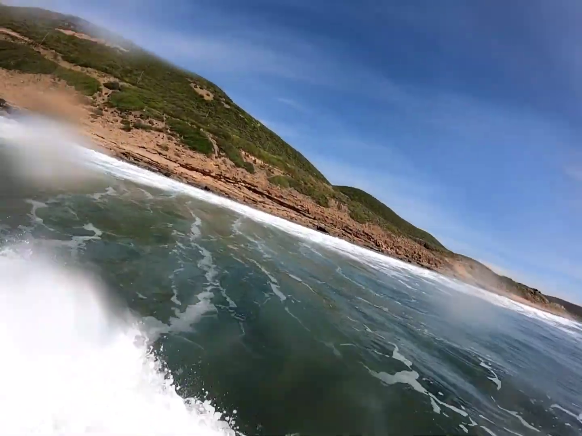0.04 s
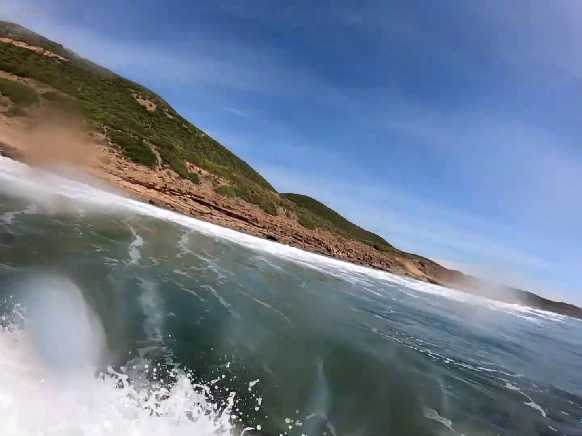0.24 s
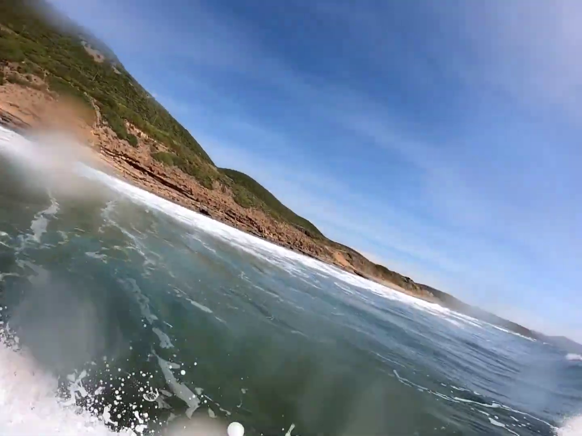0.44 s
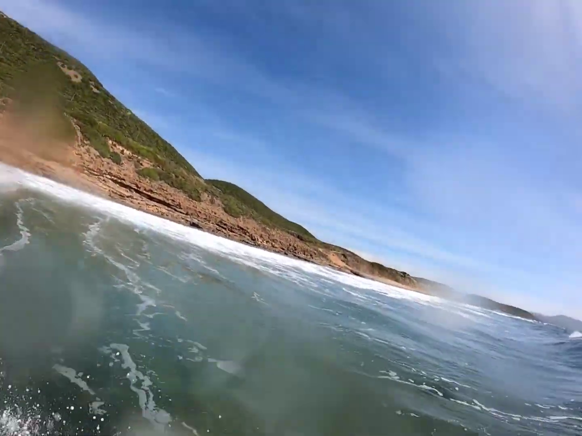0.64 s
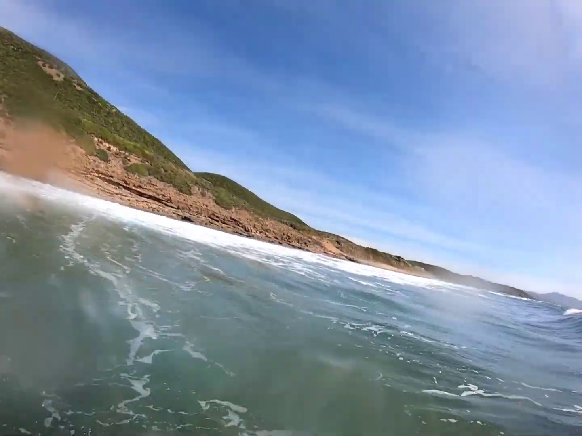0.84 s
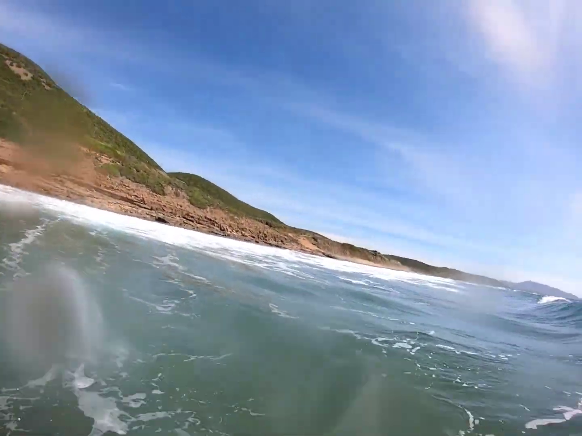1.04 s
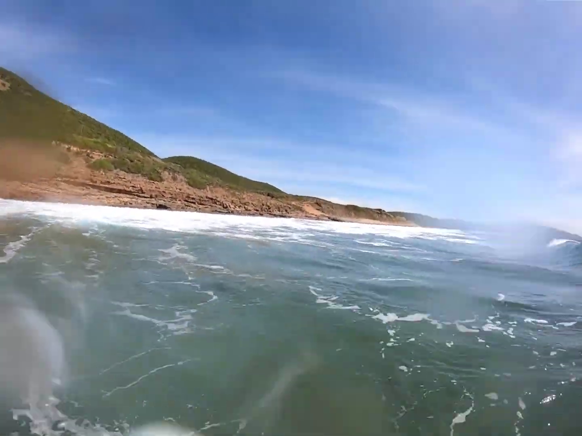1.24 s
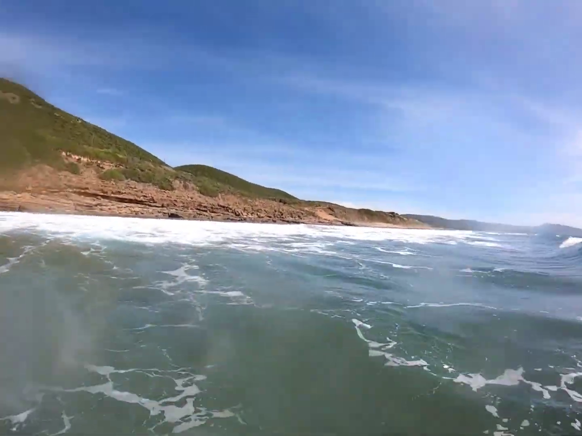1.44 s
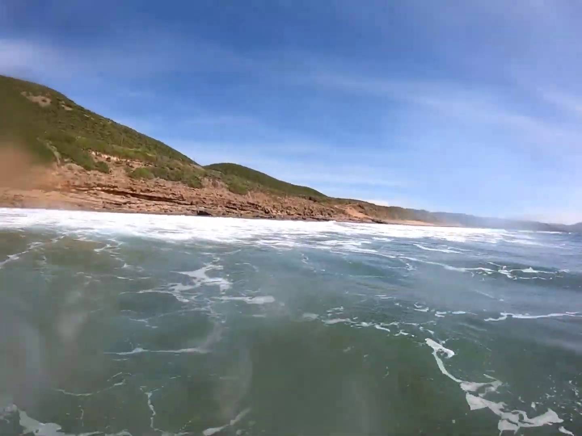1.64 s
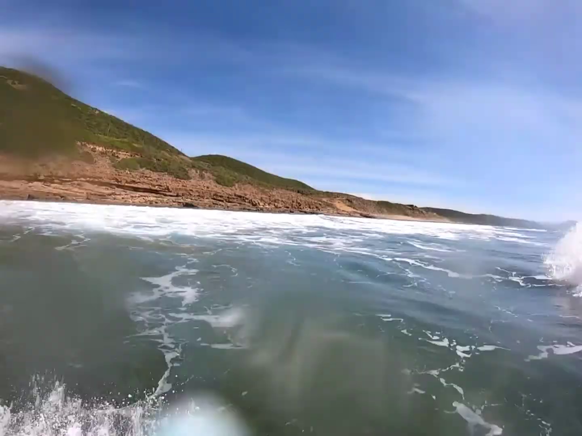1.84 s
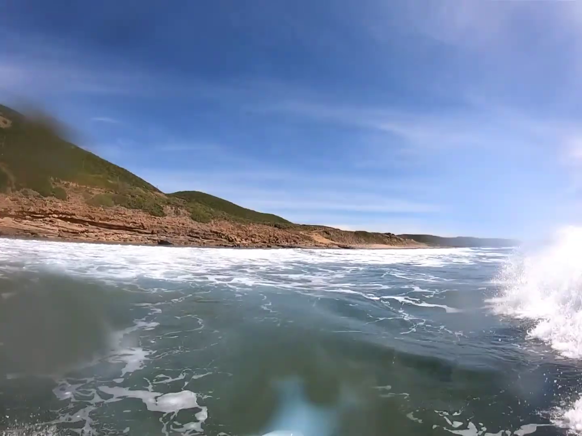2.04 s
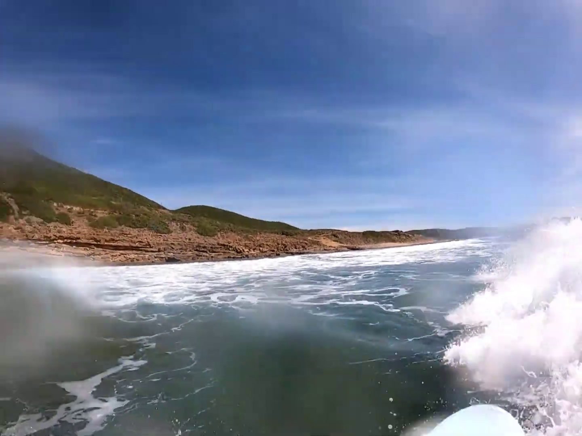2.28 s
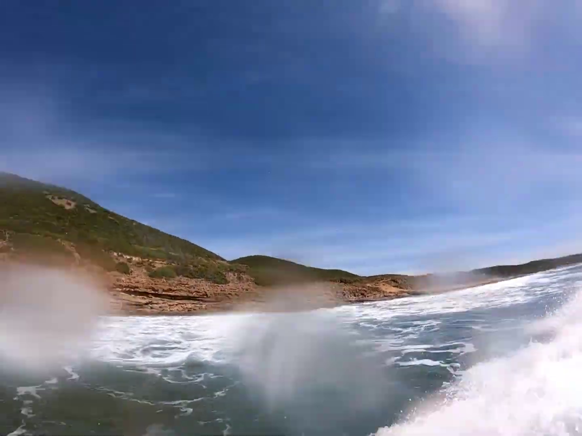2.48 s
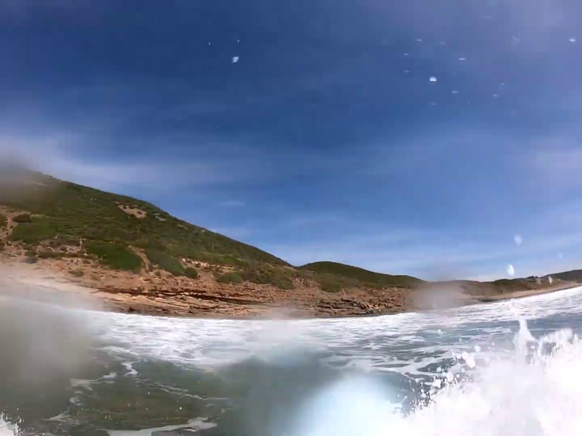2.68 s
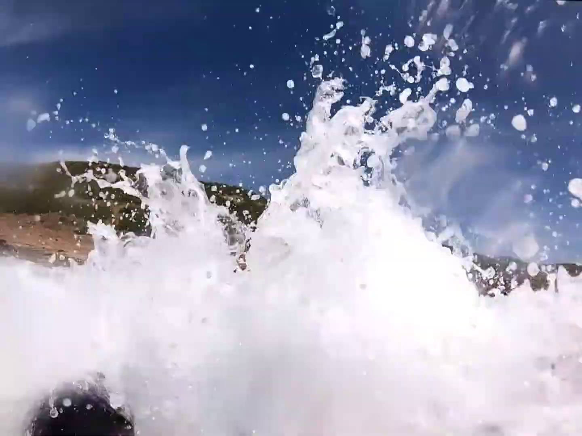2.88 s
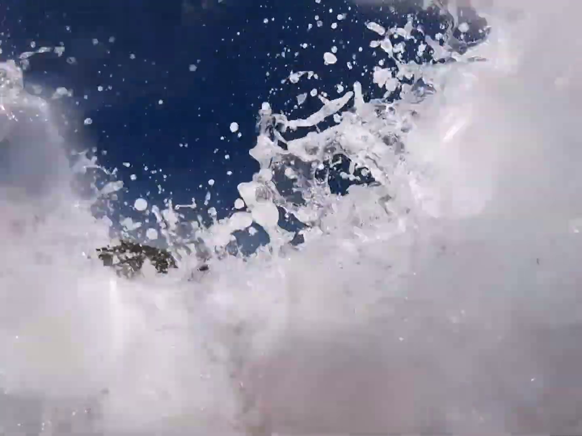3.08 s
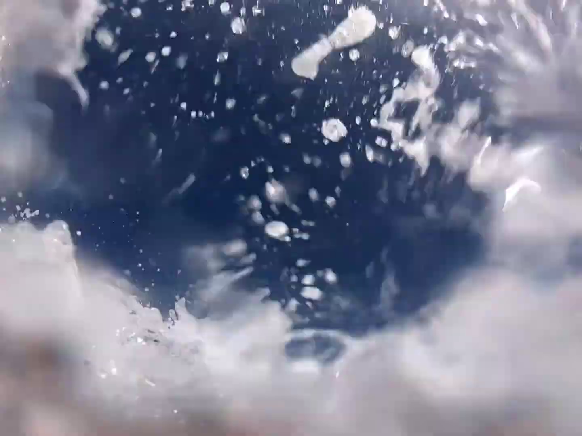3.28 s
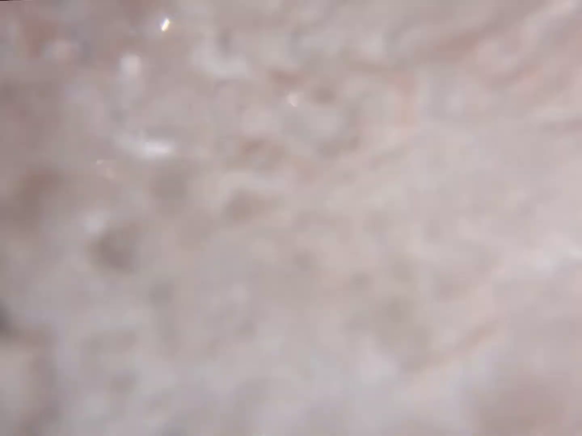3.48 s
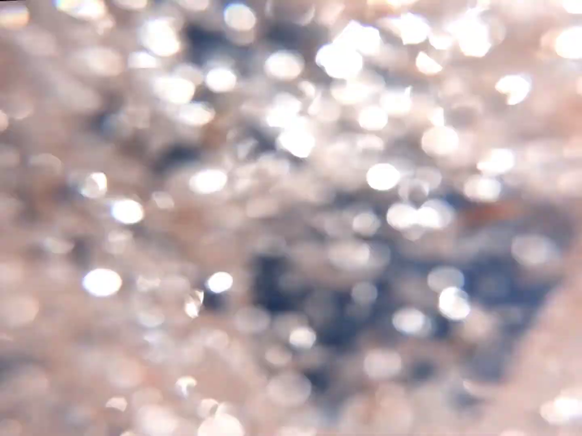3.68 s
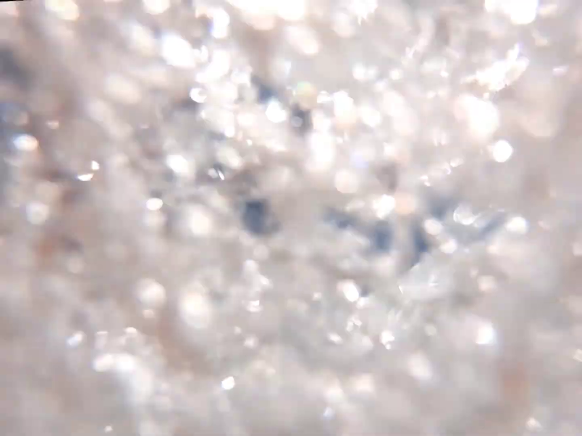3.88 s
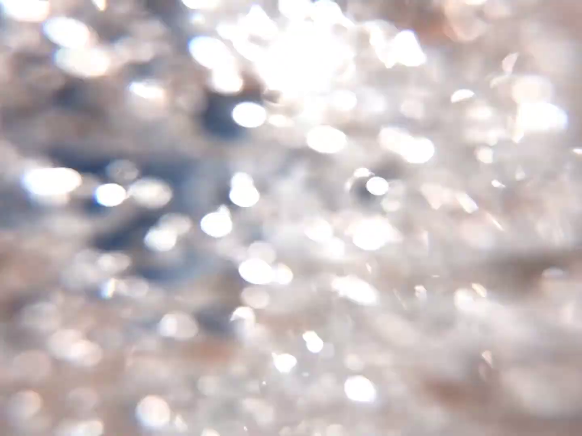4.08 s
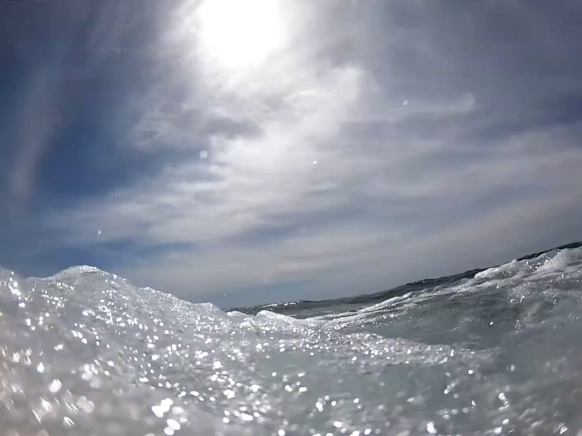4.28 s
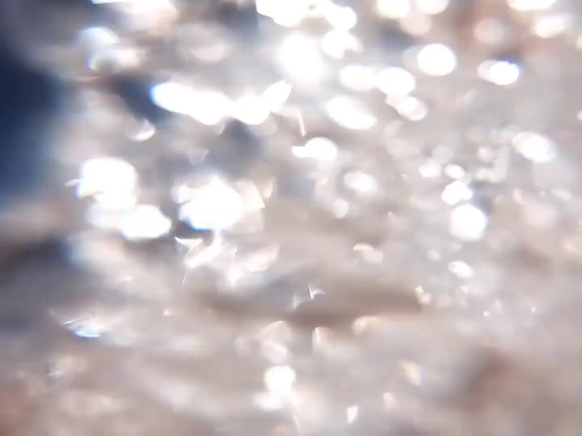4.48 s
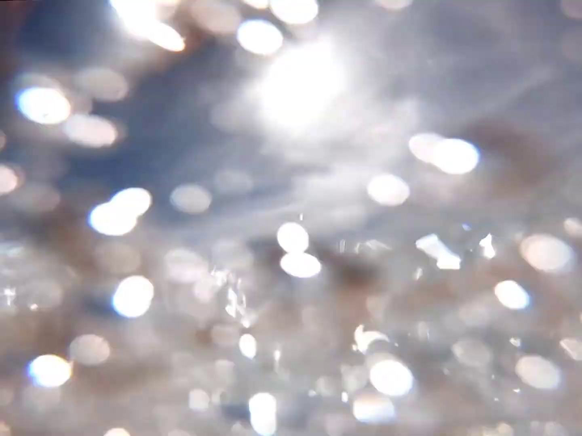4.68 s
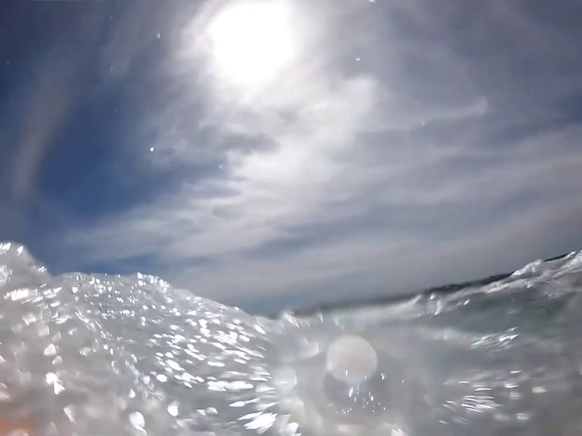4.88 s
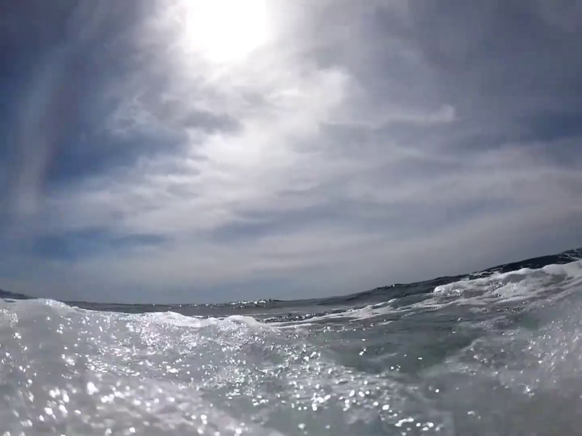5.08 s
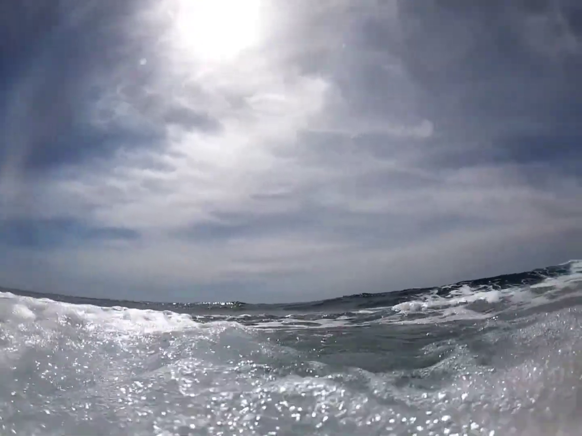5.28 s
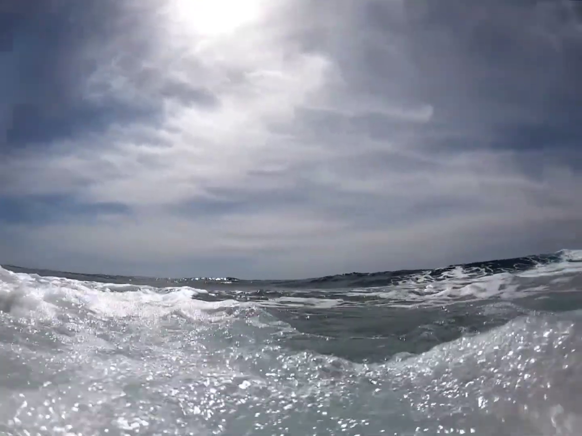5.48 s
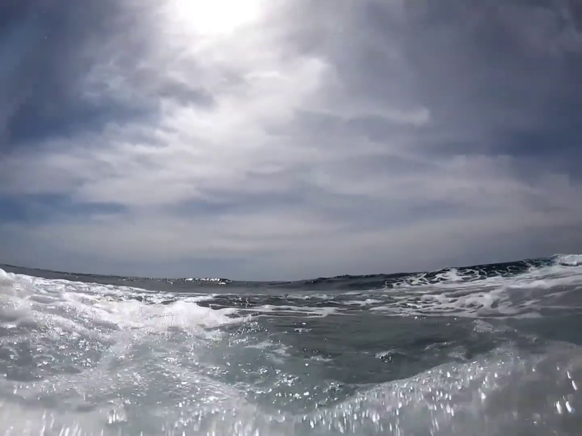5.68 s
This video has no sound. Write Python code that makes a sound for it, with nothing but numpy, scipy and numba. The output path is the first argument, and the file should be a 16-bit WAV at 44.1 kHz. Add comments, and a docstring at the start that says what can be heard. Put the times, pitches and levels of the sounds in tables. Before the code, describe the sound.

Rushing seawater and wind buffet the microphone, then a wave splashes over it and everything turns to muffled sloshing, gurgles and bubbles.

```python
"""At the waterline on a surfboard, a sealed camera rides along as the wake rushes past in the wind.
White water sprays the case, then the camera tumbles under. Sloshing water thumps and slaps the case,
air pockets gurgle, and small bubbles sing and pop. Water over the microphone port (its small opening)
dulls the sea, and the sound drops out for a moment under water."""
import sys
import numpy as np
from scipy import signal
from scipy.fft import rfft, irfft, next_fast_len
from scipy.io import wavfile
from scipy.ndimage import uniform_filter1d
from numba import njit

SR = 44100
rng = np.random.default_rng(int(sys.argv[2]) if len(sys.argv) > 2 else 0)


def output_pcm(signal):
    """Save a mono or channel-first signal as 16-bit PCM at the path in sys.argv[1].

    Samples are clipped to [-1, 1] before scaling.
    """
    pcm = np.clip(np.atleast_2d(signal).T, -1, 1) * 32767
    wavfile.write(sys.argv[1], SR, np.round(pcm).astype(np.int16))


N = 252693
T = np.arange(N) / SR
DROPOUT_START_S, DROPOUT_END_S = 4.32434, 4.37276

# Wake and wind while the port is in the open: (time [s], level [dB])
WAKE_LEVEL = [(0.0, -24.5), (1.99, -27), (2.48, -24.5), (3.12, -23.5), (3.33, -20.5), (3.37, -18),
              (3.45, -21), (3.5, -33.5), (4.33, -42.5)]
# How strong the wake is from low to high: (frequency [Hz], level [dB])
WAKE_TONE = [(15, -45.5), (25, -7), (70, -4.5), (128, 0), (231, -4), (558, -3.5), (968, -14.5), (1380, -26),
             (1790, -25.5), (2450, -33), (2950, -33.5), (3250, -39.5), (4700, -45.5), (5050, -56.5),
             (7500, -66.5), (9500, -85)]
# Boost or cut of the foam's high fizz: (time [s], gain [dB])
FIZZ_GAIN = [(0, 1), (.3, -0.5), (2.2, 4), (2.6, -2), (3.3, 3.5), (3.5, -3.5), (3.98, 5), (4.05, 5.5)]
# Foam heard again each time the port clears: (time [s], level [dB], length [s])
FOAM_GUSHES = [(3.514, -23, 0.062), (3.595, -27, 0.047), (3.676, -23, .11), (3.817, -29.5, 0.17),
               (3.976, -31.5, 0.015), (4.225, -31, 0.0087)]
# Thin spot in the foam and spray, where the port cancels sound: (time [s], frequency [Hz])
PORT_DIP_HZ = [(0, 1280), (.4, 1320), (1.1, 1355), (1.4, 1620), (2.0, 1476), (2.3, 1490), (2.52, 1590),
               (2.66, 1184), (3.3, 1296), (3.5, 700), (3.9, 852), (4.02, 1410)]
# Top of what the water film over the port lets through: (time [s], frequency [Hz])
FILM_CUTOFF = [(0, 13730), (3.35, 13600), (3.4, 3326), (4.32, 3320), (4.37, 2250), (5.73, 2050)]

# Water heaving around the case: (time [s], level [dB])
SLOSH_LEVEL = [(2.9, -41.5), (3.3, -31.5), (3.45, -18), (4.03, -16), (4.06, -18), (4.3, -16.5),
               (4.55, -23.5), (4.9, -17.5), (5.23, -26), (5.37, -34.5), (5.73, -30.5)]
# How strong the slosh is from low to high: (frequency [Hz], level [dB])
SLOSH_TONE = [(12, -38.5), (25, -6), (50, -6), (100, -11.5), (150, -15), (270, -25), (300, -38.5),
              (700, -52.5), (1000, -62), (1700, -58.5), (1900, -69), (2550, -68), (2750, -93.5)]
# Low edge of the slosh, sinking as the case goes deeper: (time [s], frequency [Hz])
SLOSH_LOW_EDGE = [(2.9, 65), (3.9, 93), (4.4, 51), (5.73, 9.2)]
# Single lurches of that water: (time [s], level [dB])
SLOSH_LURCHES = [(3.355, -10), (4.39, -16.5), (5.26, -28.5), (5.42, -22.5), (5.69, -22.5)]
# Single slaps and gulps: (time [s], level [dB], pitch [Hz])
WATER_SLAPS = [(2.934, 1.5, 307), (2.982, -3, 224), (3.071, 1.5, 201), (3.145, -7, 214), (3.206, -3.5, 209),
               (3.358, -7.5, 610), (3.368, -6, 400), (3.382, 0.5, 300), (3.408, 9.5, 280), (3.466, 5, 230),
               (3.523, -3.5, 368), (3.571, 1.5, 390), (3.701, 5, 191), (3.783, -6.5, 489),
               (3.979, 2.5, 379), (4.026, 0.5, 181), (4.128, -7, 535), (4.165, -4, 358), (4.237, -4, 482),
               (4.304, -9, 194), (4.368, -9.5, 152), (4.417, -11.5, 248), (4.643, -0.5, 292.4),
               (4.715, 1, 185), (4.864, -5, 240), (4.994, -15, 206.4), (5.132, -15.5, 235.6),
               (5.273, -19, 187), (5.468, -16, 207.5), (5.689, -19, 273.5)]

# Hollow behind the case door, shaken by the water: (time [s], level [dB])
HOLLOW_LEVEL = [(2.88, -20.5), (3.27, -17.5), (3.47, -21.5), (3.49, -30), (3.7, -25), (4.3, -26),
                (4.6, -22), (5.1, -26.5), (5.73, -34)]
# Its note as water fills and leaves it: (time [s], pitch [Hz])
HOLLOW_PITCH = [(2.95, 286.5), (3.02, 206.3), (3.25, 196.4), (3.38, 389.6), (3.47, 245.3), (3.53, 369),
                (3.78, 471), (3.95, 445), (4.3, 456), (4.38, 233.5), (5.73, 238.5)]
# Air pocket at the port, rung by drops and bubbles: (time [s], level [dB])
POCKET_LEVEL = [(0, -46), (.22, -42.5), (.4, -59.5), (2.26, -54.5), (2.36, -45), (2.62, -35.5),
                (2.9, -38.5), (3.3, -25.5), (3.47, -25.5), (3.6, -37), (3.67, -24.5), (3.77, -24.5),
                (3.79, -35.5), (3.9, -35.5), (4.11, -71.5), (4.58, -58), (4.68, -41.5), (4.87, -48),
                (4.96, -58.5), (5.73, -64)]
# Its note as it swells and shrinks: (time [s], pitch [Hz])
POCKET_PITCH = [(.3, 1700), (2.28, 1497), (2.35, 1810), (2.54, 1880), (2.62, 1604), (2.85, 1556),
                (3.1, 997), (3.5, 940), (3.75, 1194), (3.87, 1183), (3.9, 1617), (4.2, 1856), (4.4, 1014),
                (4.9, 1057), (5.4, 1435)]
# Gurgles that ring it harder: (time [s], level [dB])
POCKET_GURGLES = [(2.292, -27), (3.375, -20.5), (3.528, -21.5), (3.569, -24), (3.63, -19.5), (3.854, -29.5),
                  (4.13, -40), (4.629, -34)]

# Mist of white water around the case: (time [s], level [dB])
SPRAY_LEVEL = [(2.28, -61), (2.31, -47), (2.45, -45), (2.55, -49.5), (2.9, -56), (3.2, -63), (3.3, -42.5),
               (3.37, -40), (3.4, -51.5), (3.65, -70.5)]
# How strong the spray is from low to high: (frequency [Hz], level [dB])
SPRAY_TONE = [(410, -30.5), (700, 1.5), (1300, 2), (2400, -15), (4000, -27), (5000, -36.5), (7500, -52),
              (10500, -65), (13000, -96)]
# Volleys of drops striking the case: (time [s], level [dB])
SPRAY_VOLLEYS = [(2.292, -36.5), (2.315, -43), (2.93, -43.5), (3.079, -43), (3.14, -43), (3.01, -50.5),
                 (3.25, -40.5), (3.323, -35), (3.343, -32), (3.356, -32), (3.383, -41.5)]
# Spurts hitting the port itself: (time [s], level [dB], rough pitch [Hz])
PORT_SPURTS = [(1.358, -13, 696), (2.582, -11, 700), (2.864, -19, 923), (2.93, -18.5, 755),
               (3.369, -5, 890), (3.446, -6.5, 703), (3.699, -13, 990), (3.825, -15.5, 1170),
               (3.858, -15, 1150), (3.891, -13.5, 744), (3.938, -19, 1490), (4.122, -16.5, 1450),
               (4.171, -16, 708), (4.632, -19.5, 700), (4.649, -23, 597), (4.696, -34.5, 950),
               (4.731, -18, 584), (4.764, -31, 940), (4.851, -31.5, 1074), (4.986, -39, 600),
               (5.17, -36.5, 547), (5.293, -40.5, 600), (5.703, -34, 750)]
# Sharp ticks of drops on the port: (time [s], level [dB], rough pitch [Hz])
DROP_TICKS = [(1.865, -21.5, 1180), (2.69, -24, 1500), (3.341, -18, 2900), (3.965, -29, 2480),
              (4.232, -41, 2960), (3.3044, -49, 7100), (3.3227, -35.5, 5470), (3.671, -51, 4880),
              (3.696, -42.5, 3800), (3.866, -51, 4200), (3.963, -51, 5200), (4.166, -38, 2780),
              (4.186, -48, 3700), (4.221, -53, 4000), (4.281, -53, 3400), (4.457, -60.5, 4100),
              (4.488, -55, 2050), (4.73, -62, 3000), (4.718, -34, 1300), (4.763, -48.5, 1796),
              (4.83, -54, 2100), (4.95, -52.5, 1900), (5.082, -46.5, 1500), (5.127, -48, 1600),
              (5.21, -48, 900), (5.274, -41, 1400), (5.328, -45, 1050), (5.374, -50, 1000),
              (5.414, -44, 1390), (5.502, -51, 1750)]

# Trapped bubbles that sing for a moment: (time [s], level [dB], length [s], pitch [Hz])
SINGING_BUBBLES = [(3.491, -45, 0.043, 2320), (3.72, -40.5, 0.097, 1134), (3.852, -23.5, 0.017, 1117),
                   (3.938, -36, 0.044, 1567), (4.014, -45, 0.043, 1926), (4.017, -45, 0.03, 2290),
                   (4.148, -42, 0.063, 1906), (4.125, -46, 0.055, 2370), (4.417, -48.5, 0.12, 950),
                   (4.421, -48, 0.077, 1154), (4.694, -46.5, 0.15, 962), (5.266, -53.5, 0.038, 1094)]
# Crackle of tiny bubbles at the wet port: (time [s], level [dB])
CRACKLE_LEVEL = [(3.4, -42.5), (4.3, -46.5), (4.45, -43), (4.9, -53.5), (5.73, -53.5)]
# The middle of their range of notes: (time [s], pitch [Hz])
CRACKLE_PITCH = [(3.4, 2690), (4.3, 2620), (4.4, 780), (5.73, 814)]


def wake():
    """Dense bursts of foam rush by in the wind; the high fizz swells on its own."""
    bursts = impacts(per_s=20000, scatter_db=1.8)
    foam = port_dip(texture(bursts, WAKE_TONE, (450, 900), swell_db=.5 * wander(45), flicker_db=1.2))
    body = signal.sosfiltfilt(signal.butter(3, 1300, fs=SR, output="sos"), foam)
    fizz = undb(follow(FIZZ_GAIN)) * (foam - body)
    gushes = surges(*np.transpose(FOAM_GUSHES), rise_db_s=795.5, fall_db_s=599.5)
    return np.hypot(loudness(WAKE_LEVEL), gushes) * (body + fizz)  # hypot adds their powers


def slosh():
    """Lumps of water shove the case in deep, uneven surges."""
    shoves = impacts(per_s=3000, scatter_db=1.0)
    rumble = texture(shoves, SLOSH_TONE, (25, 150), swell_db=0.52 * wander(24), flicker_db=0.93)
    band, low = band_and_low(rumble, follow(SLOSH_LOW_EDGE), 0.99)
    heave = rumble - band - low  # keeps what lies above the low edge
    lurches = surges(*np.transpose(SLOSH_LURCHES), hold_s=0.039, rise_db_s=352, fall_db_s=126)
    return np.hypot(loudness(SLOSH_LEVEL), lurches) * heave


def slaps():
    """Each slap rings a bubble-filled space whose note glides up a little; harder ones die sooner."""
    out, t = np.zeros(N), np.arange(8192) / SR
    soft_push = (1 - np.exp(-t / 0.0011)) ** 2
    for start, db, hz in WATER_SLAPS:
        ring_s = np.clip(0.038 * undb(-0.54 * db), .008, .15)  # time to fade by 60 dB
        ring = np.sin(2 * np.pi * hz * t * (1 + 0.22 * t)) * np.exp(-np.log(1000) * t / ring_s)
        add_at(out, start, undb(db) * soft_push * ring)
    return out


def door_hollow():
    """The hollow behind the door glugs at each slap, most when the slap is near its own note."""
    starts, slap_db, slap_hz = np.transpose(WATER_SLAPS)
    octaves_apart = np.abs(np.log2(slap_hz / follow(HOLLOW_PITCH, starts)))
    glug_db = -16.5 + 0.53 * slap_db - 8 * octaves_apart
    glugs = surges(starts, glug_db, hold_s=0.0066, rise_db_s=1400, fall_db_s=520.5)
    ring = trapped_air(HOLLOW_PITCH, kicks_per_s=1200, damping=0.26, tremble=0.044)
    deep_ring = unit(bandpass(ring, follow(HOLLOW_PITCH), 0.14))  # deep under water it rings clearer
    return np.hypot(loudness(HOLLOW_LEVEL), glugs) * np.where(T < DROPOUT_END_S, ring, deep_ring)


def air_pocket():
    """Drops and bubbles make a small pocket of air at the port gurgle."""
    gurgles = surges(*np.transpose(POCKET_GURGLES), hold_s=0.0018, rise_db_s=898, fall_db_s=297)
    ring = trapped_air(POCKET_PITCH, kicks_per_s=1500, damping=0.2, tremble=.03)
    return np.hypot(loudness(POCKET_LEVEL), gurgles) * ring


def spurts():
    """Water hits the port in short, wet bursts of noise."""
    out, t = np.zeros(N), np.arange(4096) / SR
    shape = (1 - np.exp(-t / 0.0012)) ** 2 * np.exp(-t / 0.0082)
    for start, db, hz in PORT_SPURTS:
        burst = bandpass(rng.standard_normal(len(t)), hz, 0.71)
        burst = lowpass(burst, 1.8 * hz, 6.6)
        burst = lowpass(burst, 1.52 * hz, 1.4)
        add_at(out, start, undb(db) * shape * unit(burst))
    return out


def spray():
    """Droplets of white water strike the case as a mist and in quick volleys."""
    droplets = impacts(per_s=20000, scatter_db=0.39)
    mist = texture(droplets, SPRAY_TONE, (2400, 6000), swell_db=1.2 * wander(60.03), flicker_db=1.0)
    volleys = surges(*np.transpose(SPRAY_VOLLEYS), hold_s=0.0053, rise_db_s=1504.5, fall_db_s=699.5)
    return port_dip(np.hypot(loudness(SPRAY_LEVEL), volleys) * mist)


def drop_ticks(decay_s=0.003):
    """Each drop on the port makes a very short hiss around its pitch."""
    out, t = np.zeros(N), np.arange(1024) / SR
    shape = t / decay_s * np.exp(1 - t / decay_s)
    for start, db, hz in DROP_TICKS:
        hiss = rng.standard_normal(len(t))
        for _ in range(3):
            hiss = bandpass(hiss, hz, 0.71)
        hiss = lowpass(hiss, 1.3 * hz, 0.87)
        hiss = lowpass(hiss, 1.2 * hz, 1.8)
        add_at(out, start, undb(db) * shape * unit(hiss) / 2)
    return out


def singing_bubbles(fade_s=0.0099):
    """Each trapped bubble sings a thin tone that wavers in pitch and strength."""
    out, t = np.zeros(N), np.arange(16384) / SR
    for start, db, length, hz in SINGING_BUBBLES:
        noises = rng.standard_normal((2, len(t)))
        pitch_waver, level_waver = [unit(uniform_filter1d(noise, size=300)) for noise in noises]
        tone = np.sin(2 * np.pi * np.cumsum(hz * (1 + .007 * pitch_waver)) / SR)
        fade = np.clip(np.minimum(t, length + fade_s - t) / fade_s, 0, 1)
        add_at(out, start, undb(db + 4.9 * level_waver) * fade * tone)
    return out


def bubble_crackle(count=600):
    """Tiny bubbles each pop in a few vibrations; the higher, the fainter."""
    out, t = np.zeros(N), np.arange(2048) / SR
    first_s = CRACKLE_LEVEL[0][0]
    for when, highness, faintness in rng.random((count, 3)):
        start = first_s + when * (N / SR - first_s)
        pitch_spread = 1.5 if start < DROPOUT_START_S else 2.4
        cycles = t * follow(CRACKLE_PITCH, start) * pitch_spread ** (2 * highness - 1)
        pop = (cycles / 0.59) ** 2 * np.exp(-cycles / 0.89) * np.sin(2 * np.pi * cycles)
        db = -3.2 * np.log(faintness + 0.0035) - 15 * highness
        add_at(out, start, undb(db) * pop)
    return loudness(CRACKLE_LEVEL) * out


def trapped_air(pitch, kicks_per_s, damping, tremble):
    """Bubbles kick trapped air, which rings on a trembling note; little comes out above that note."""
    hz = follow(pitch) * (1 + tremble * wander(25))
    kicks = impacts(kicks_per_s, scatter_db=3.3) * undb(1.2 * wander(40))
    ring = bandpass(kicks, hz, damping)
    ring = bandpass(ring, hz, 3 * damping)
    ring = lowpass(ring, 1.01 * hz, 1.0)
    return unit(lowpass(ring, 1.2 * hz, 1.0))


def port_dip(sound, depth=0.6):
    """The port partly cancels a band of sound that wanders with the water in it."""
    return sound - depth * bandpass(sound, follow(PORT_DIP_HZ), 0.36)


def water_film(sound):
    """Water over the port muffles the high notes."""
    for damping in (1.93, 1.41, .52):
        sound = lowpass(sound, follow(FILM_CUTOFF), damping)
    return sound


def impacts(per_s, scatter_db):
    """Clicks at random moments: most are small, a few are big."""
    hits = rng.random(N) < per_s / SR
    return hits * rng.standard_normal(N) * undb(scatter_db * np.minimum(rng.exponential(size=N), 3.5))


def texture(source, tone, anchor_hz, swell_db, flicker_db):
    """Shapes a sound's tone, then lets its half-octave bands swell together and flicker alone."""
    hz, db = np.transpose(tone)
    size = next_fast_len(N)
    freqs = np.maximum(np.arange(size // 2 + 1) * SR / size, 1.)
    spectrum = rfft(source, size) * undb(np.interp(np.log(freqs), np.log(hz), db, left=-120, right=-120))
    anchor = (freqs > anchor_hz[0]) & (freqs < anchor_hz[1])
    spectrum /= np.std(irfft(spectrum * anchor, size))  # this range gets strength 1
    out = 0
    for step in range(int(2 * np.log2(hz[0])), int(2 * np.log2(hz[-1])) + 2):
        share = np.clip(1 - np.abs(2 * np.log2(freqs) - step), 0, 1)
        flicker = undb(swell_db + flicker_db * wander(14))
        out = out + irfft(spectrum * share, size)[:N] * unit(flicker)
    return out


def surges(starts, db, hold_s, rise_db_s, fall_db_s):
    """Volume of events that rise, hold and fall, with slopes in dB per second; their powers add."""
    t = T[::32, None]  # coarse time steps
    below_peak_db = rise_db_s * np.maximum(starts - t, 0) + fall_db_s * np.maximum(t - starts - hold_s, 0)
    power = np.sum(undb(db - below_peak_db) ** 2, axis=1)
    return np.interp(T, t[:, 0], np.sqrt(power))


def wander(per_s):
    """A smooth random wobble, about 1 in size."""
    hold = max(int(SR / per_s), 2)
    steps = np.repeat(rng.standard_normal(N // hold + 1), hold)
    return unit(uniform_filter1d(uniform_filter1d(steps, hold), hold)[:N])


def loudness(table):
    """Volume over time, fading in before the table starts and silent after it ends."""
    times, db = np.transpose(table)
    return undb(np.interp(T, times, db, right=-200) - 200 * np.clip(times[0] - T, 0, 1))


@njit
def band_and_low(sound, hz, damping):
    """A moving filter: gives the sound near hz and the sound below it. Less damping rings longer."""
    band, low = np.empty(len(sound)), np.empty(len(sound))
    band_memory, low_memory = 0., 0.
    for i in range(len(sound)):
        tuning = np.tan(np.pi * hz[i] / SR)
        swing = (band_memory + tuning * (sound[i] - low_memory)) / (1 + tuning * (tuning + damping))
        band[i], low[i] = damping * swing, low_memory + tuning * swing
        band_memory, low_memory = 2 * swing - band_memory, low_memory + 2 * tuning * swing
    return band, low


def bandpass(sound, hz, damping):
    """Keeps what is near hz."""
    return band_and_low(sound, hz * np.ones(len(sound)), damping)[0]


def lowpass(sound, hz, damping):
    """Keeps what is below hz."""
    return band_and_low(sound, hz * np.ones(len(sound)), damping)[1]


def follow(table, times=T):
    """Joins a table's points with straight lines."""
    return np.interp(times, *np.transpose(table))


def add_at(out, start_s, sound):
    """Mixes a short sound in at the given time."""
    i = int(start_s * SR)
    out[i:i + len(sound)] += sound[:N - i]


def undb(db):
    """Turns decibels into a volume factor."""
    return 10 ** (np.asarray(db) / 20)


def unit(x):
    """Scales a signal to an average strength (rms) of 1."""
    return x / np.sqrt(np.mean(x ** 2))


def scene():
    """The sea is heard through the water film; spray and ticks stay bright on top."""
    sea = wake() + slosh() + door_hollow() + air_pocket() + slaps() + spurts()
    bubbles = singing_bubbles() + bubble_crackle()
    return (water_film(sea + bubbles) + spray() + drop_ticks())[None]


def record(dry, snap_db=-18, snap_s=0.0012, top_hz=15676):
    """Loud peaks are rounded over a faint circuit hiss; a short dropout snaps at each edge."""
    sound = np.tanh(0.81 * dry) / 0.89 + undb(-94.0) * rng.standard_normal(N)
    from_edge_s = np.minimum(np.abs(T - DROPOUT_START_S), np.abs(T - DROPOUT_END_S))
    sound += np.exp(-from_edge_s / snap_s) * (undb(snap_db) - sound)  # an offset that snaps when cut
    sound *= (T < DROPOUT_START_S) | (T > DROPOUT_END_S)
    return signal.sosfilt(signal.ellip(8, .2, 70, top_hz, fs=SR, output="sos"), sound)


dry = scene()
out = record(dry)
output_pcm(out)
```